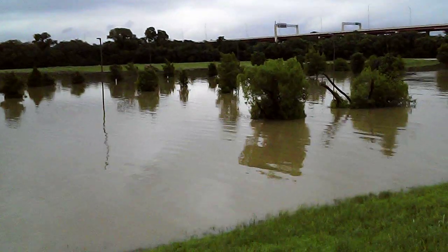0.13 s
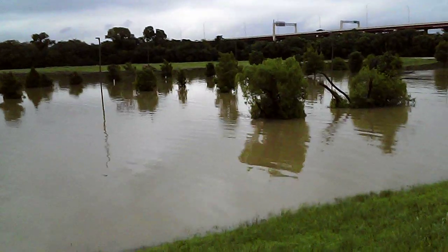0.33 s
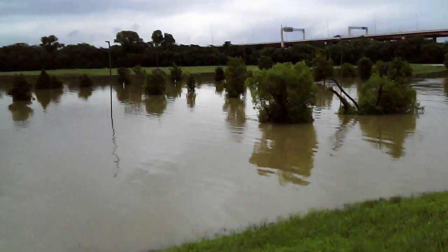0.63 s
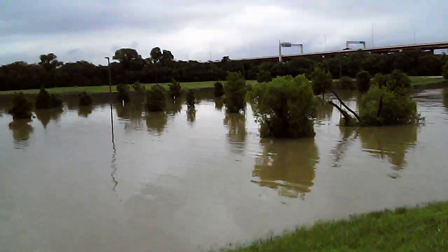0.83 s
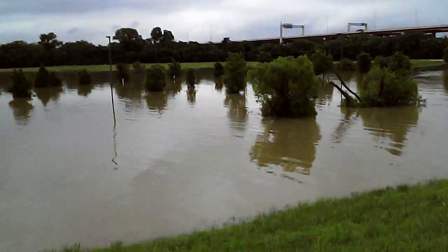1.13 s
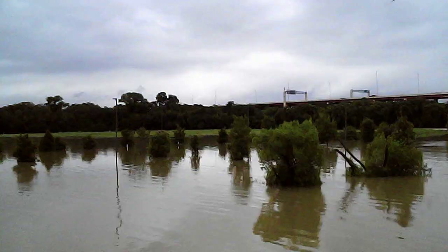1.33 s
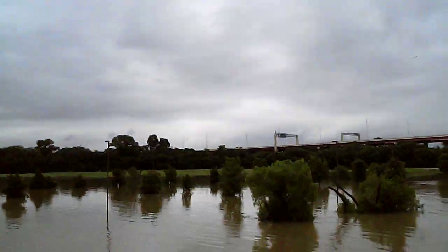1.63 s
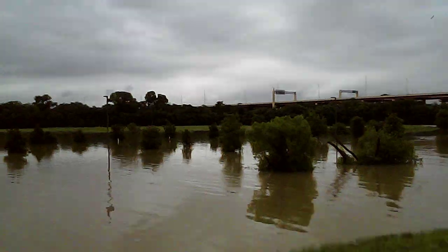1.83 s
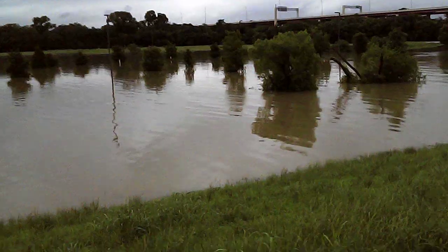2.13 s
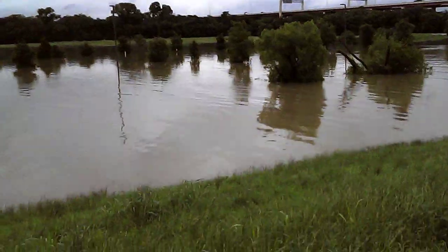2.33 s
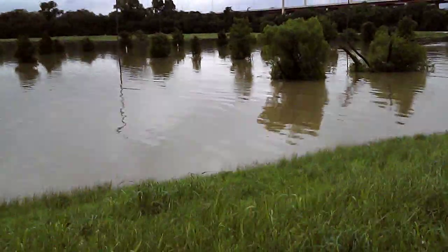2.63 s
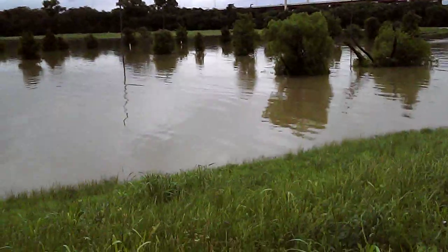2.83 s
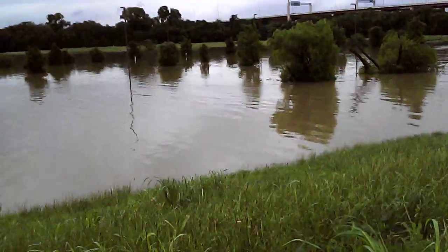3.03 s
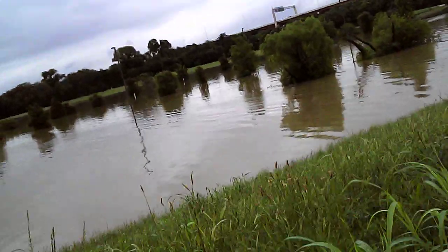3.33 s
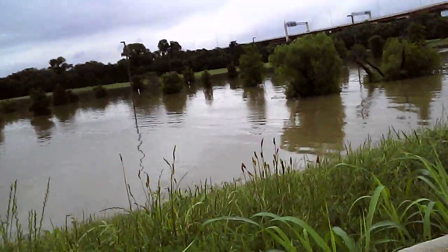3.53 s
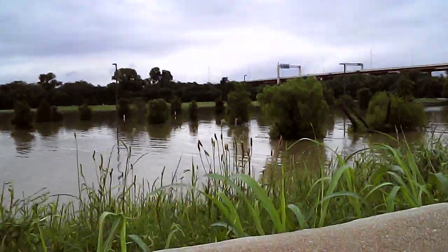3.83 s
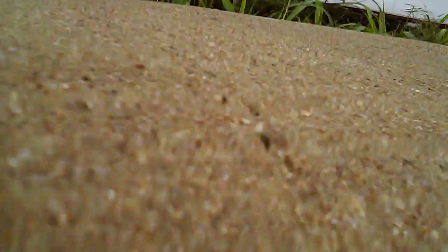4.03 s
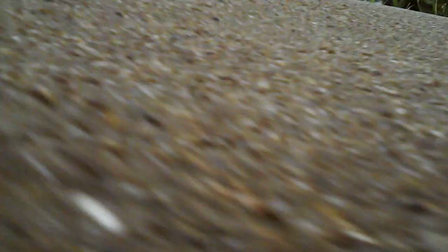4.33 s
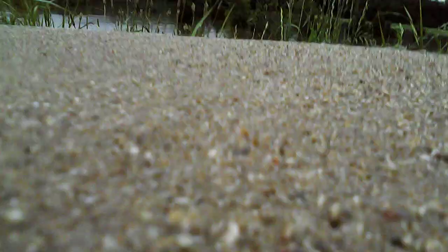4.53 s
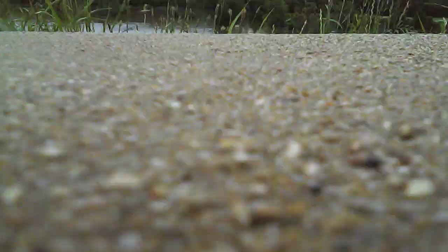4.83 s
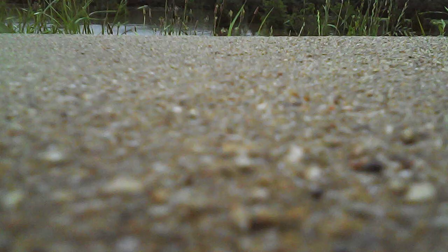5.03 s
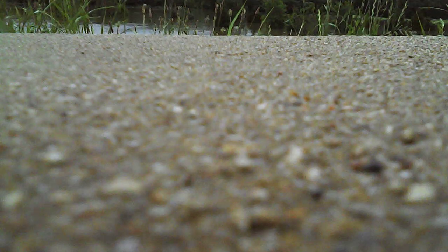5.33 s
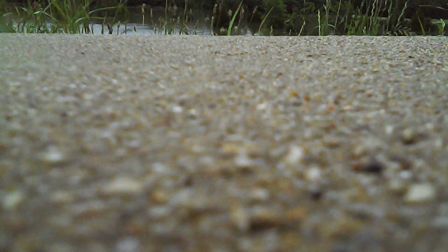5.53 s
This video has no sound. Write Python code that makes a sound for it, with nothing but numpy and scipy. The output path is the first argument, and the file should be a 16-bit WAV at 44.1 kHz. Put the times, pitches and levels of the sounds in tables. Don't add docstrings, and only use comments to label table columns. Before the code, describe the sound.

Outdoors, very close and heavily clipped: several drone rotors beat together in a rough, unsteady low buzz roughened by downwash and shaking. Landing brings a jolt, a pitch jump and sagging motor tone, then quick knocks, gritty scrapes and shell rattle on concrete. The motors cut just before five seconds, leaving small fading rattles over a quiet distant traffic wash.

```python
import sys
import numpy as np
from scipy import signal
from scipy.fft import rfft, irfft, next_fast_len
from scipy.io import wavfile
from scipy.ndimage import map_coordinates

SR = 44100
rng = np.random.default_rng(int(sys.argv[2]) if len(sys.argv) > 2 else 0)


def ratio(d):
    e = np.asarray(d, float) / 20
    return 10 ** e


def put_to_file(sound):
    columns = np.atleast_2d(sound).T
    safe = np.clip(columns, -1, 1)
    whole_steps = np.round(safe * 32767)
    wavfile.write(sys.argv[1], SR, whole_steps.astype(np.int16))


N = 250477

# time in seconds, tone in Hz.
NEAR_ROTOR = [(0.0, 212.1), (0.55, 202.6), (0.77, 213.6), (1.06, 217.3), (1.4, 205), (1.9, 222.5),
              (2.6, 218.8), (3.15, 208), (3.47, 213.4), (3.57, 203.8), (3.85, 221), (3.97, 209.7),
              (4.05, 243.2), (4.1, 222.6), (4.19, 177.3), (4.36, 183.4), (4.52, 168)]
# time in seconds, tone in Hz.
SLOW_ROTOR = [(0.0, 140), (0.15, 155), (0.42, 142), (0.8, 157), (1.25, 156), (1.4, 142), (1.75, 148),
              (1.9, 157), (2.4, 160.5), (2.85, 159.5), (3.25, 147), (3.98, 149.1), (4.1, 159.4)]
# time in seconds, tone in Hz.
FAR_BLADES = [(0.0, 326.3), (0.6, 308), (1.22, 320.9), (1.36, 338), (1.75, 343.9), (1.87, 305), (2.2, 312),
              (2.6, 298), (3.0, 310), (3.38, 302.3), (3.6, 329), (4.1, 314.2), (4.22, 334.1), (4.45, 310.8)]
# multiple of shaft speed, level in dB.
SHAFT_ORDERS = [(1, -20.5), (2, -20), (4, -17.5), (5, -21), (6, -19.5)]
# time in seconds, length in seconds, loss in dB.
STALLS = [
    (0.154, 0.059, 6),
    (0.255, 0.026, 7.5),
    (0.443, 0.042, 8.5),
    (0.541, 0.025, 9.5),
    (4.22, 0.085, 15),
    (4.337, .03, 14),
    (4.414, .1, 8),
    (4.3, .7, 2.5),
]
# time in seconds, length in seconds, gain in dB.
SLOW_SURGES = [
    (0.153, 0.62, -9.5),
    (1.625, 0.52, -6),
    (3.852, .2, 5),
]
# time in seconds, length in seconds, gain in dB.
FAR_SURGES = [
    (0.302, .2, 3.5),
    (1.056, 0.61, 3.5),
    (2.757, .5, 2.5),
    (3.244, .3, -4),
    (4.215, .13, 10),
]
# time in seconds, excess in dB.
OVERLOAD = [
    (0, 16.5),
    (2, 19),
    (4.2, 17.5),
    (4.45, 15),
    (4.6, 8),
    (4.8, 9),
    (4.9, 6),
    (5.68, 6.5),
]
# hover level in dB, grounded level in dB, skid level in dB,
# fade after the cut in dB per second, rest level in dB.
LAYER_STAGES = [
    (-22, -21.5, -14, 75, -45.5),
    (-12.5, -12, -12, 89.5, -26.5),
    (-18, -18, -13.5, 44.5, -47),
    (-27.5, -25.5, -26, 26.5, -56),
]
# frequency in Hz, density in dB per Hz.
BUFFET_SPECTRUM = [(10, -10.5), (25, -4), (60, -4), (95, -4), (140, -25), (300, -59)]
# frequency in Hz, width in Hz, level in dB.
ARM_MODES = [(148, 28, -2.5), (223.4, 97, -0.5), (328.4, 90.4, -1.5), (477.5, 91, -14.5)]
# frequency in Hz, width in Hz, level in dB.
SHELL_MODES = [(1069.6, 61, -2), (1169, 96, -3.5), (1379, 72, -3), (1565, 100, -6), (1711, 220, -8),
               (2243, 220, -10.5)]
# frequency in Hz, density in dB per Hz.
HISS_SPECTRUM = [(200, -54), (500, -6), (850, 6.5), (1800, 1), (2300, 1.5), (2600, -3.5), (3200, 0),
                 (3800, -9.5), (4600, -12), (5100, -21), (6000, -18), (9000, -47)]
# time in seconds, arm shake in dB, shell rattle in dB, length in seconds.
ROCKS = [(4.212, -6, -17.5, .12), (4.424, -10.5, -12, .06), (4.553, -10, -15.5, .06),
         (4.64, -7.5, -13, .06), (4.778, -10, -11, 0.064), (4.864, -17, -11.5, 0.037),
         (4.949, -15.5, -12, .07), (5.005, -16, -29, 0.045), (5.064, -24, -14.5, 0.13),
         (5.172, -16.5, -21.5, 0.099), (5.227, -21, -24, 0.15), (5.309, -20.5, -26, 0.07),
         (5.36, -18.5, -31, 0.088), (5.415, -24, -32, .04), (5.491, -19.5, -37, 0.076),
         (5.56, -20, -45, 0.035), (5.603, -37, -48, 0.031)]
# time in seconds, push in dB, length in seconds, direction (+1 or -1).
THUMPS = [
    (3.98, -5.5, 0.011, -1),
    (4.343, -11, .012, -1),
    (4.503, -9, .011, -1),
    (4.514, -11, .009, -1),
    (4.582, -11, 0.0091, -1),
    (4.671, -7.5, .016, 1),
    (4.714, -6.5, .012, -1),
    (4.748, -5, 0.011, -1),
    (4.797, -12.5, .011, -1),
    (4.82, -10, 0.014, -1),
]
# time in seconds, length in seconds, level in dB.
SCRAPES = [
    (4.427, 0.039, -23.5),
    (4.576, .09, -16.5),
    (4.692, 0.11, -22.5),
    (4.795, .08, -20),
]
# frequency in Hz, width in Hz, level in dB.
TIP_MODES = [(2350, 270, 5), (3100, 400, -8.5)]
# frequency in Hz, density in dB per Hz.
TRAFFIC_SPECTRUM = [(10, -1), (60, -9), (150, -1.5), (600, -7.5), (1200, -7.5), (2300, -12.5), (2600, -27),
                    (3500, -32.5), (6000, -56)]
# frequency in Hz, gain in dB.
CAPSULE = [(20, -1.5), (5000, -1.9), (7500, -9.5), (12000, -37)]
# frequency in Hz, gain in dB.
CONVERTER = [(9000, 0), (10400, 6), (11200, -0.5), (12300, -7.5), (15800, -4.5)]

TOUCHDOWN_S, SKID_S, CUT_S = 3.97, 4.48, 4.81
SETTLE_S = 0.01


def unit(x):
    return x / np.sqrt(np.mean(x ** 2) + 1e-20)


def along(points, hz):
    f, v = np.transpose(points)
    return np.interp(np.log(hz + 1), np.log(f + 1), v)


def curve(points):
    s, v = np.transpose(points)
    return np.interp(np.arange(N) / SR, s, v)


def wobble(rate):
    knots = rng.standard_normal(int(N * rate / SR) + 4)
    return map_coordinates(knots, [np.arange(N) * rate / SR])


def humps(times, lengths, heights):
    u = (np.arange(N) / SR - np.array(times)[:, None]) / np.array(lengths)[:, None]
    return np.array(heights) @ np.cos(np.pi * np.clip(u, -0.5, 0.5)) ** 2


def filtered(x, response):
    m = next_fast_len(N + SR // 2)
    return irfft(rfft(x, m) * response(np.fft.rfftfreq(m, 1 / SR)), m)[..., :N]


def coloured(spectrum):
    return unit(filtered(rng.standard_normal(N), lambda hz: ratio(along(spectrum, hz))))


def resonant(x, modes):
    def response(f):
        total = 0
        for k, (centre, width, db) in enumerate(modes):
            damping = 1j * f * width
            total = total + (-1) ** k * ratio(db) * damping / (centre * centre - f * f + damping)
        return total
    return unit(filtered(x, response))


def traffic():
    return ratio(-24.5) * coloured(TRAFFIC_SPECTRUM)


def layer_gain(stages, bursts=None):
    hover_db, grounded_db, skid_db, fade, rest_db = stages
    t = np.arange(N) / SR
    landed = np.clip((t - TOUCHDOWN_S) / SETTLE_S, 0, 1)
    skidding = np.clip((t - SKID_S) / SETTLE_S, 0, 1)
    db = hover_db + (grounded_db - hover_db) * landed + (skid_db - grounded_db) * skidding
    db = db - fade * np.clip(t - CUT_S, 0, None)
    power = ratio(2 * np.maximum(db, rest_db))
    if bursts is not None:
        s, burst_db, length = bursts
        power = power + humps(s, length, ratio(burst_db)) ** 2
    return np.sqrt(power)


def brush_hiss(effort):
    sputter = ratio(effort * (0.5 * wobble(30) + 2.8 * wobble(70)))
    return layer_gain(LAYER_STAGES[3]) * ratio(5.5) * sputter * coloured(HISS_SPECTRUM)


def downwash():
    return layer_gain(LAYER_STAGES[0]) * coloured(BUFFET_SPECTRUM)


def arm_shake(effort):
    s, arm_db, _, length = np.transpose(ROCKS)
    jolts = ratio(1.34 * effort * wobble(80)) * rng.standard_normal(N)
    return layer_gain(LAYER_STAGES[1], (s, arm_db, length)) * resonant(jolts, ARM_MODES)


def gear_whine(effort):
    s, _, shell_db, length = np.transpose(ROCKS)
    roughness = ratio(effort * (3.1 * wobble(50) + 2.6 * wobble(300)))
    teeth = roughness * rng.standard_normal(N)
    whine = resonant(resonant(teeth, SHELL_MODES), [(1294, 1270, -1)])
    return layer_gain(LAYER_STAGES[2], (s, shell_db, length)) * ratio(-3.0) * whine


def scrape():
    s, length, db = np.transpose(SCRAPES)
    grit = ratio(8.8 * wobble(250)) * rng.standard_normal(N)
    return humps(s, length, ratio(db)) * resonant(grit, TIP_MODES)


def thumps():
    s, db, length, direction = np.transpose(THUMPS)
    return humps(s, length, np.sign(direction) * ratio(db + 4.5))


def turning(track, jitter):
    t = np.arange(N) / SR
    running = np.clip((track[-1][0] - t) / 0.029, 0, 1)
    shaken = jitter * (1 + 3 * (t > TOUCHDOWN_S))
    phase = 2 * np.pi * np.cumsum(curve(track)) / SR + shaken * wobble(45)
    return phase, np.sqrt(2) * running


def shaft():
    phase, running = turning(NEAR_ROTOR, jitter=0.42)
    turns = phase / 3
    return running * sum(ratio(db + 2.75 * wobble(9)) * np.sin(k * turns) for k, db in SHAFT_ORDERS)


def rotor(track, level_db, jitter, flutter_db):
    phase, running = turning(track, jitter)
    return running * ratio(level_db + flutter_db * wobble(35)) * np.sin(phase)


def rotors():
    near_db = -6.52 - humps(*np.transpose(STALLS))
    near = rotor(NEAR_ROTOR, near_db, jitter=0.19, flutter_db=1.5)

    slow_hz = curve(SLOW_ROTOR)
    pull_db = 92.5 * np.log(slow_hz / slow_hz.mean())
    slow_db = -15.5 + pull_db + humps(*np.transpose(SLOW_SURGES))
    slow = rotor(SLOW_ROTOR, slow_db, jitter=0.24, flutter_db=2.5)

    far_db = -16 + 1.5 * wobble(6) + humps(*np.transpose(FAR_SURGES))
    far = rotor(FAR_BLADES, far_db, jitter=0.29, flutter_db=1.5)

    jolt_db = np.minimum(humps([4.008], [0.1], [22]), 11)
    return ratio(-jolt_db) * (near + far + shaft()) + ratio(jolt_db) * slow


def scene():
    overload_db = curve(OVERLOAD)
    effort = np.clip(overload_db / 12, 0.2, 1)
    airframe = downwash() + arm_shake(effort) + gear_whine(effort) + brush_hiss(effort)
    craft = rotors() + airframe + thumps() + scrape()
    return (ratio(overload_db) * craft + traffic())[None]


def top_cut(x):
    return signal.sosfilt(signal.butter(12, 15830, fs=SR, output="sos"), x)


def record(dry):
    rail, smooth_hz, second_hz = 0.71, 1630, 6050
    sensed = filtered(dry, lambda hz: ratio(along(CAPSULE, hz)))
    railed = np.clip(sensed, -rail, rail) - 0.005
    railed = railed + ratio(-50.5) * rng.standard_normal(N)

    def response(hz):
        return ratio(along(CONVERTER, hz)) / (1 + 1j * hz / smooth_hz) / (1 + 1j * hz / second_hz)

    start = railed[:, :1]
    mix = start + filtered(railed - start, response)
    return top_cut(mix)


dry = scene()
out = record(dry)
put_to_file(out)
```